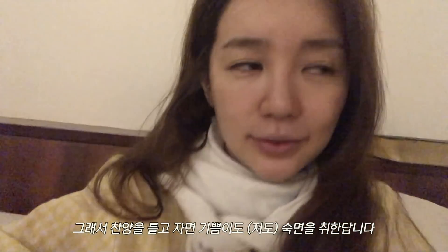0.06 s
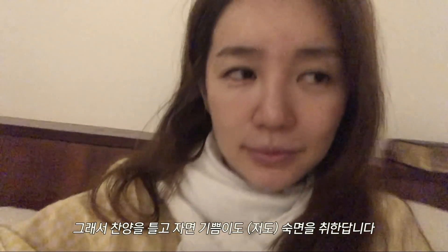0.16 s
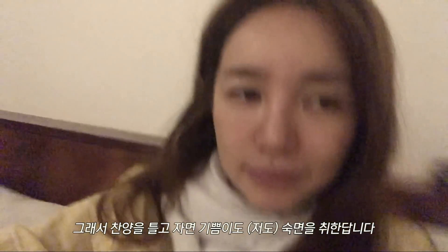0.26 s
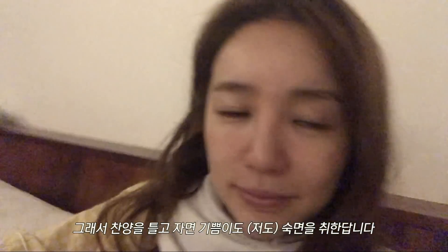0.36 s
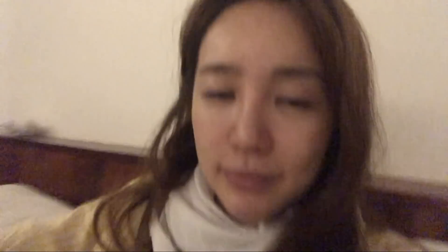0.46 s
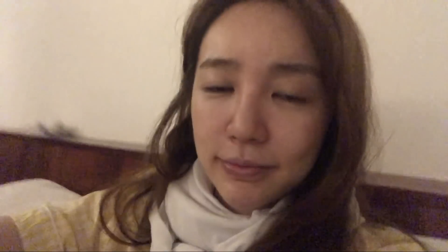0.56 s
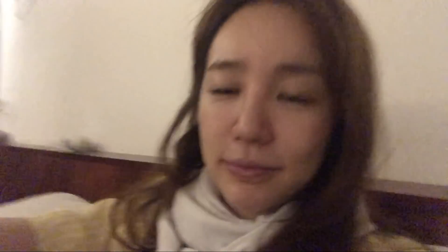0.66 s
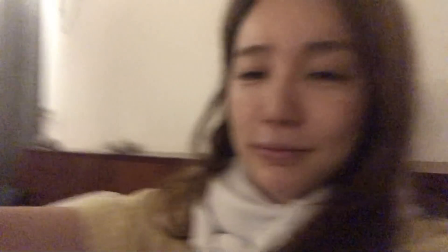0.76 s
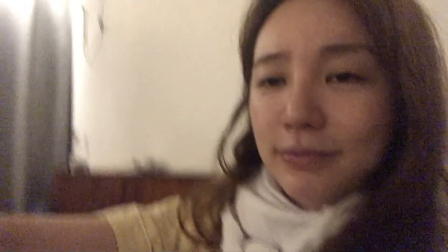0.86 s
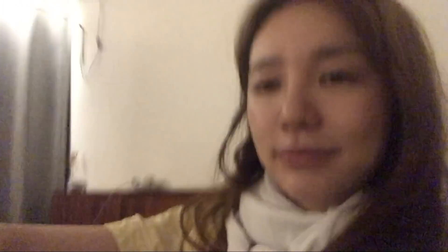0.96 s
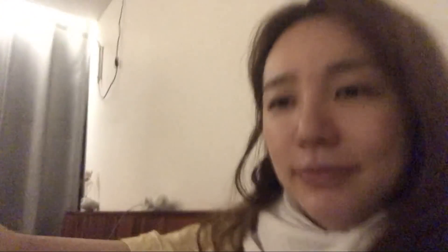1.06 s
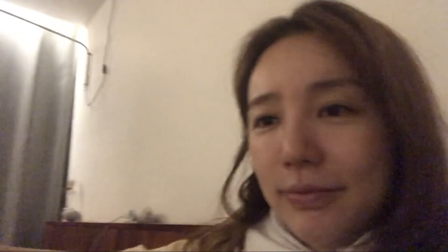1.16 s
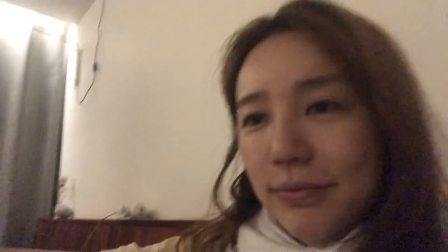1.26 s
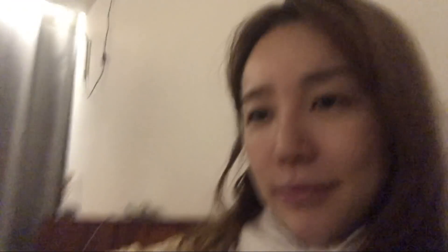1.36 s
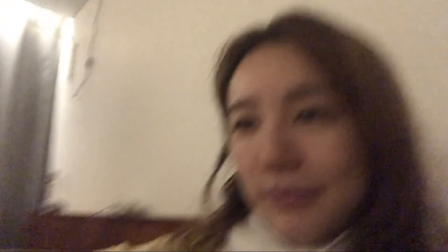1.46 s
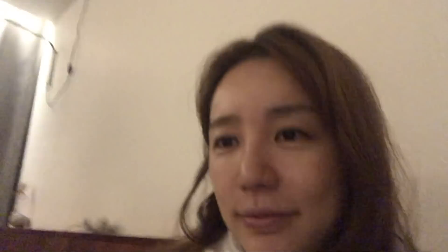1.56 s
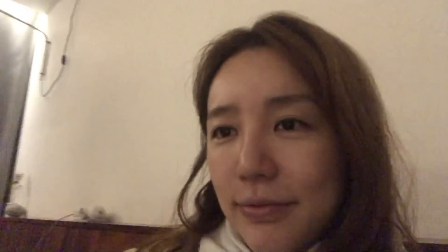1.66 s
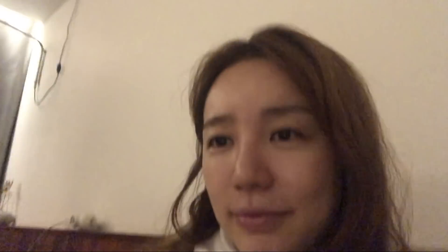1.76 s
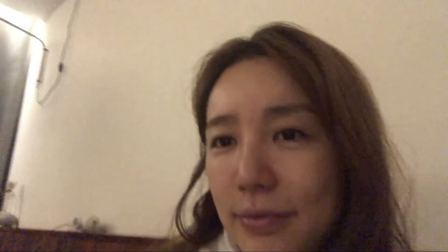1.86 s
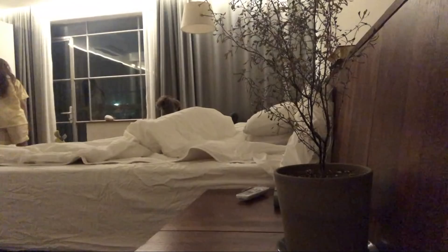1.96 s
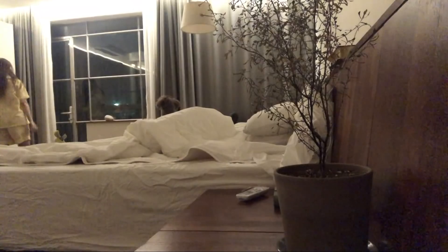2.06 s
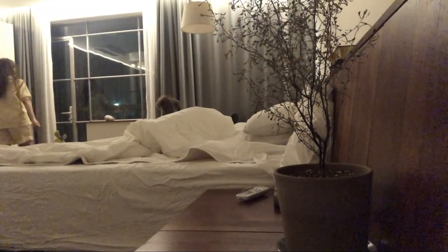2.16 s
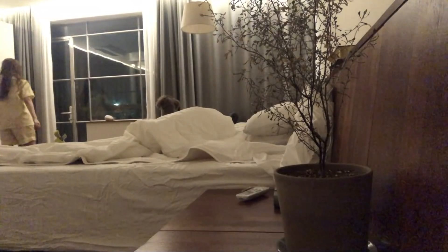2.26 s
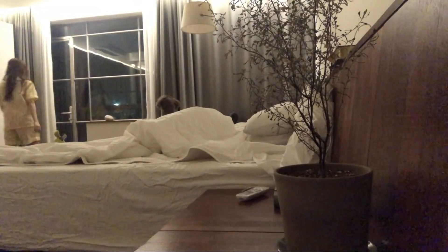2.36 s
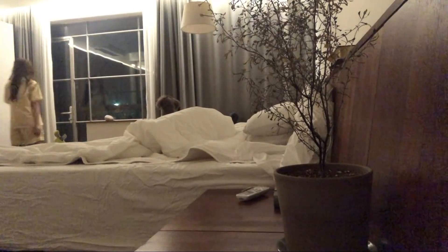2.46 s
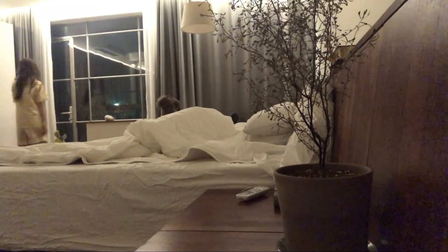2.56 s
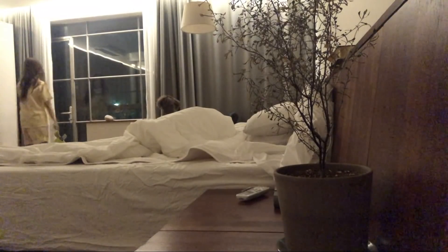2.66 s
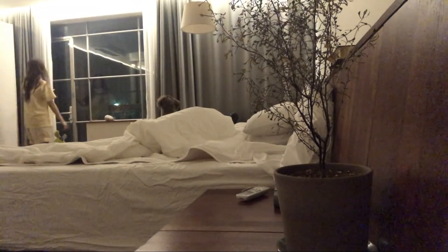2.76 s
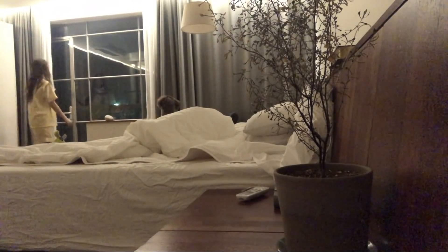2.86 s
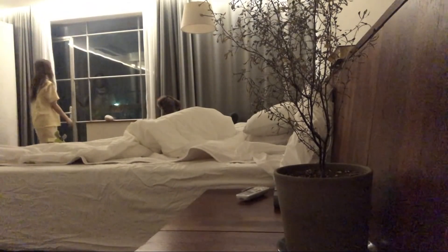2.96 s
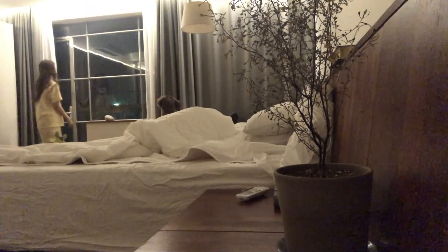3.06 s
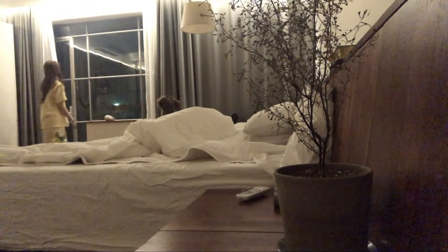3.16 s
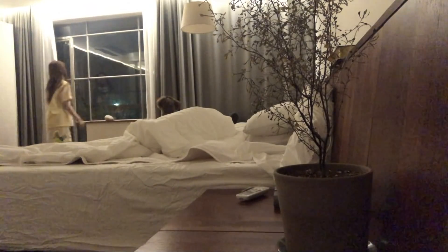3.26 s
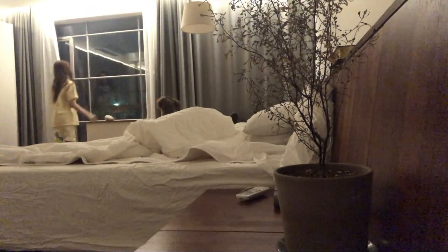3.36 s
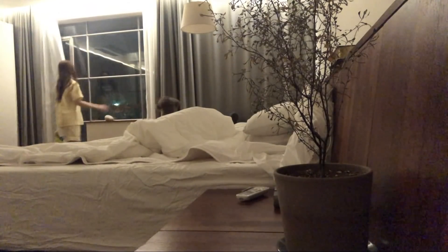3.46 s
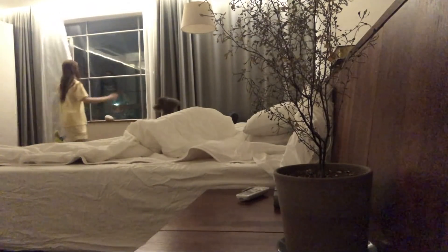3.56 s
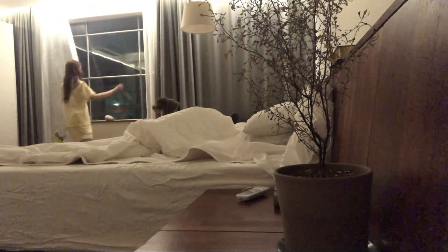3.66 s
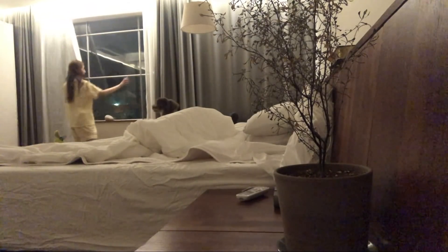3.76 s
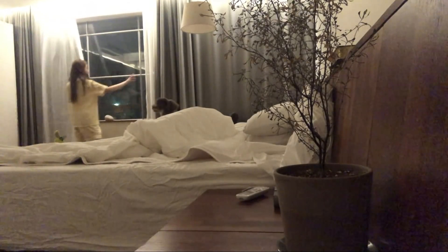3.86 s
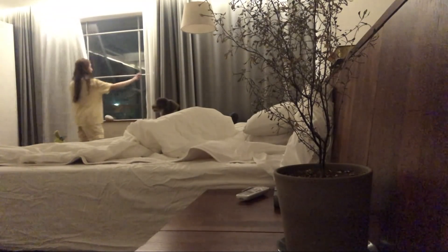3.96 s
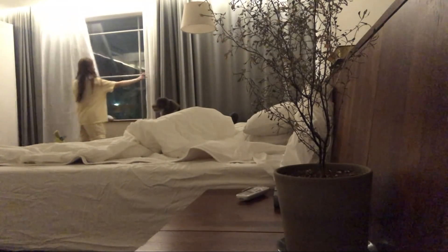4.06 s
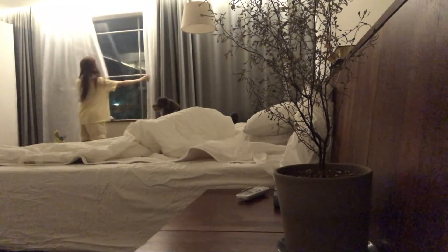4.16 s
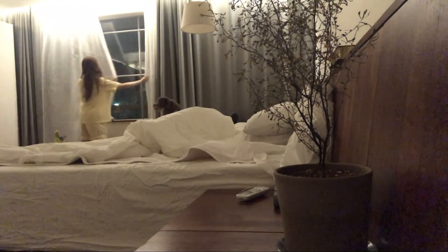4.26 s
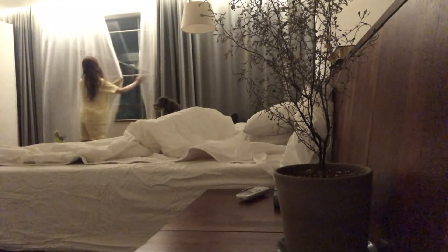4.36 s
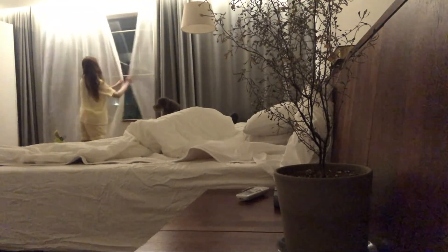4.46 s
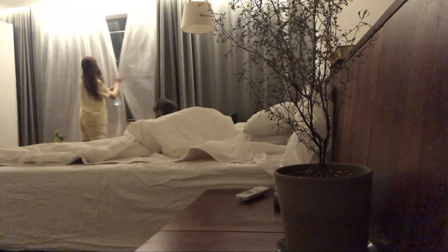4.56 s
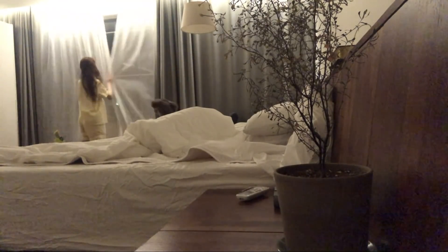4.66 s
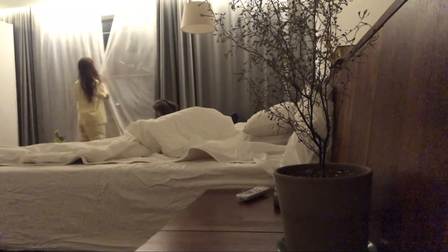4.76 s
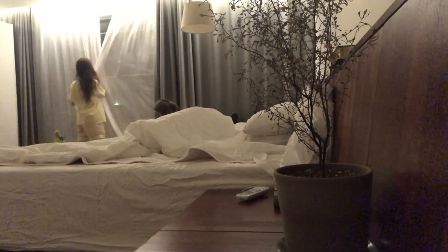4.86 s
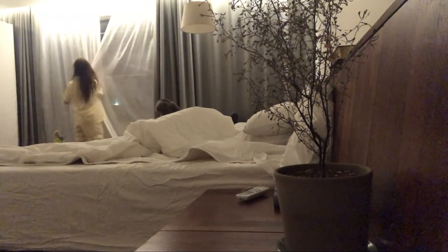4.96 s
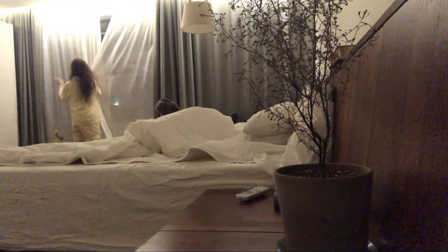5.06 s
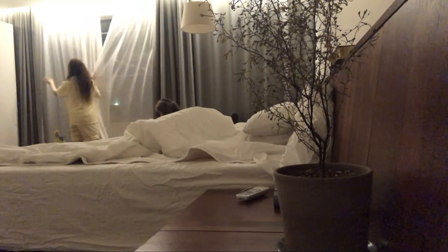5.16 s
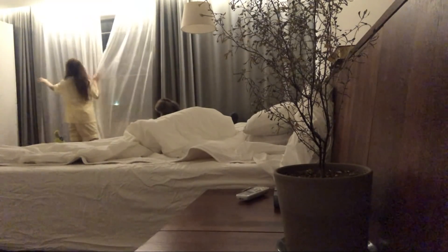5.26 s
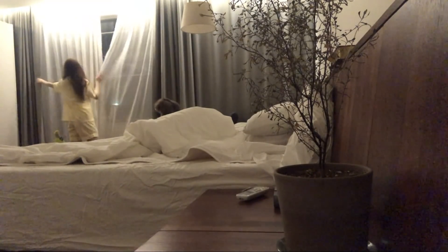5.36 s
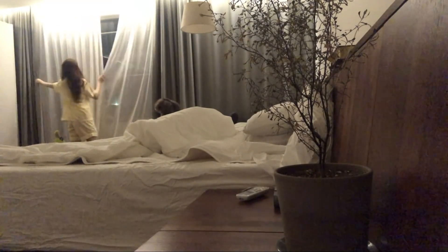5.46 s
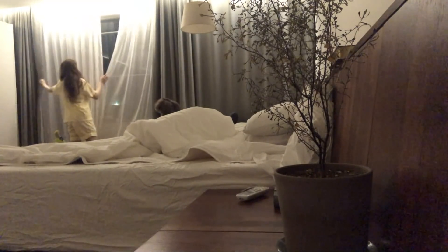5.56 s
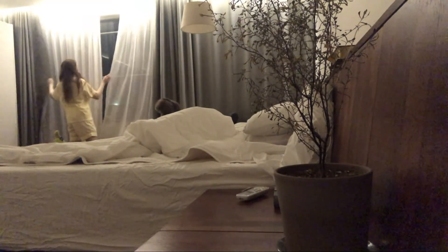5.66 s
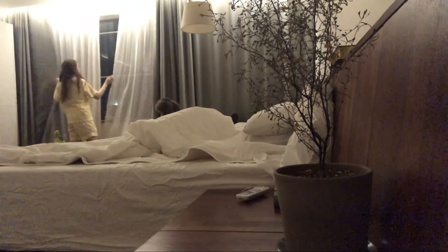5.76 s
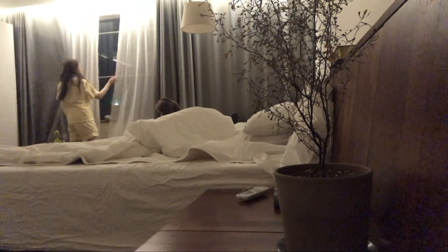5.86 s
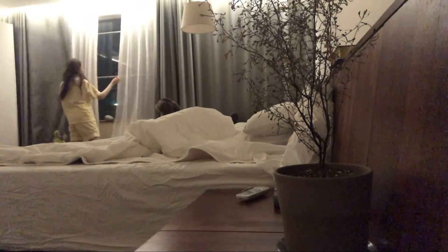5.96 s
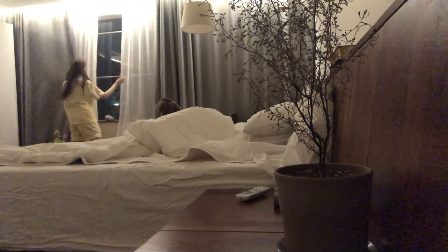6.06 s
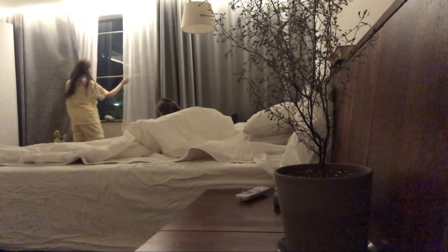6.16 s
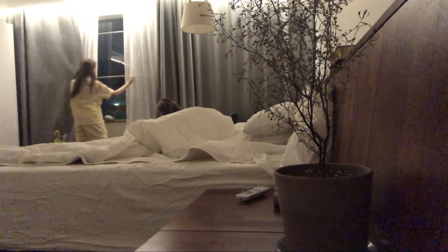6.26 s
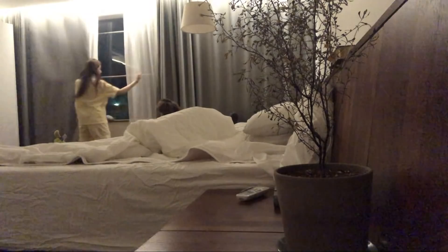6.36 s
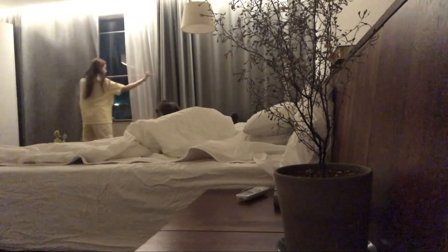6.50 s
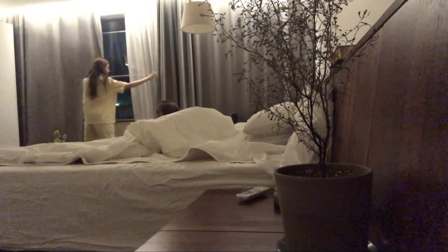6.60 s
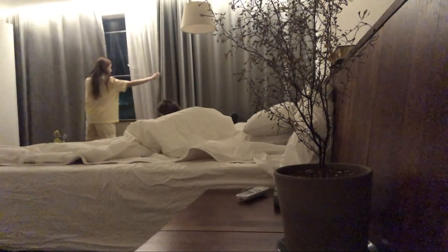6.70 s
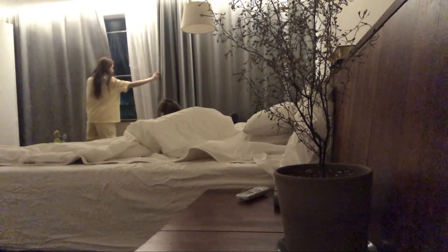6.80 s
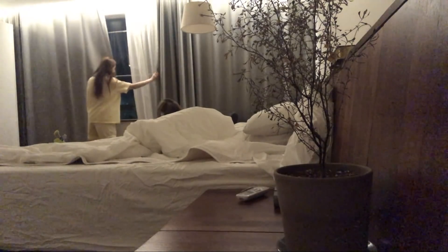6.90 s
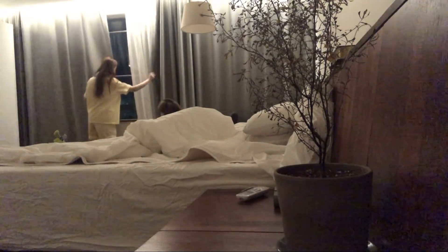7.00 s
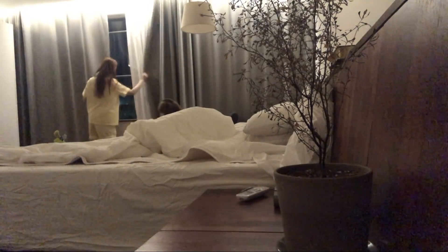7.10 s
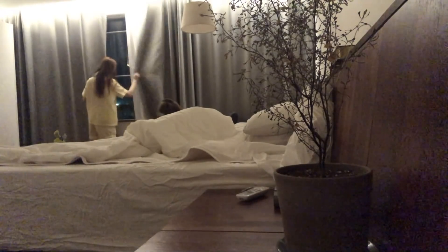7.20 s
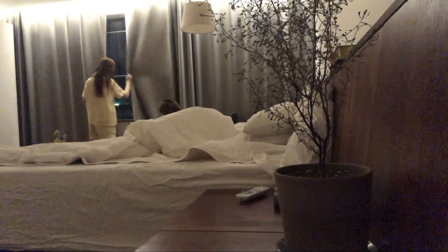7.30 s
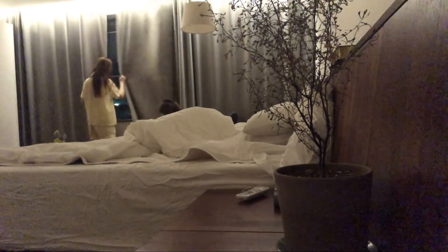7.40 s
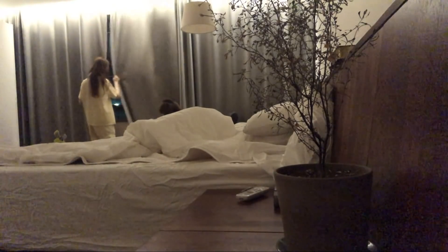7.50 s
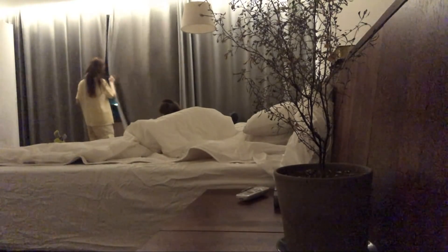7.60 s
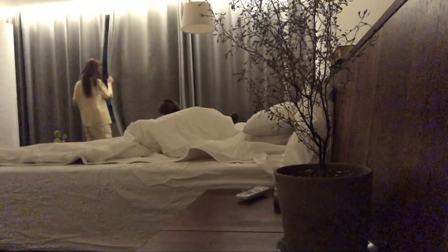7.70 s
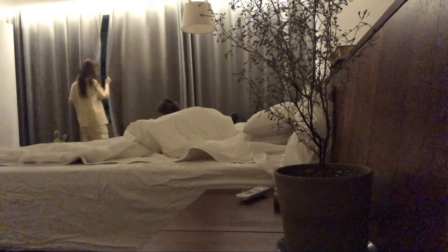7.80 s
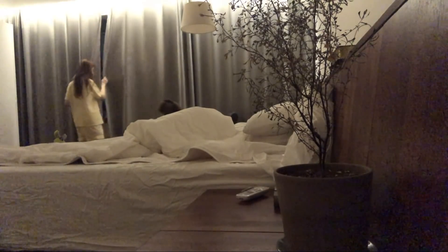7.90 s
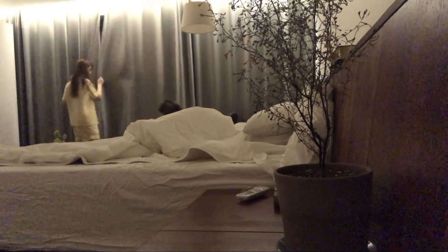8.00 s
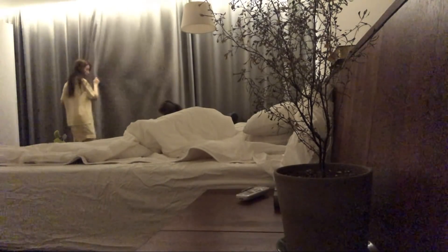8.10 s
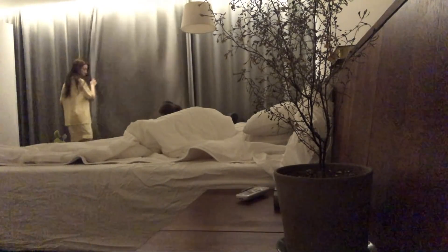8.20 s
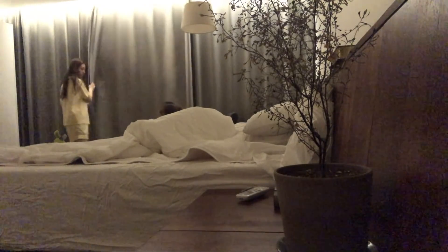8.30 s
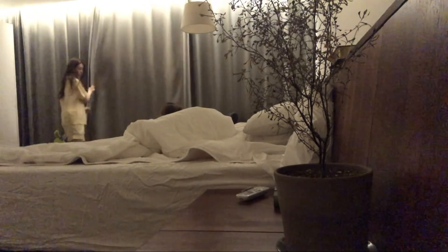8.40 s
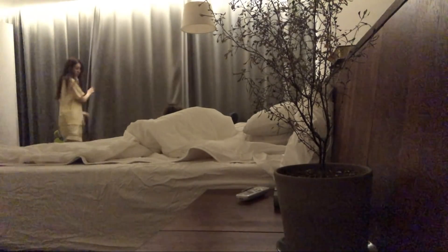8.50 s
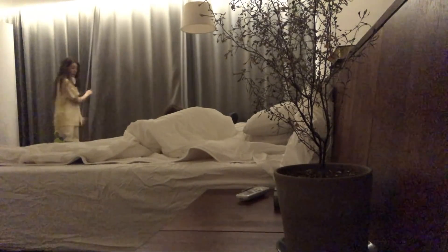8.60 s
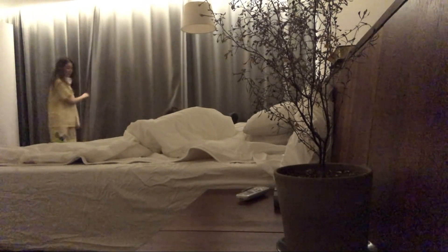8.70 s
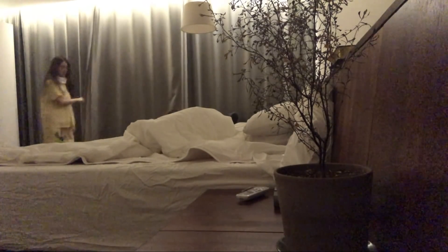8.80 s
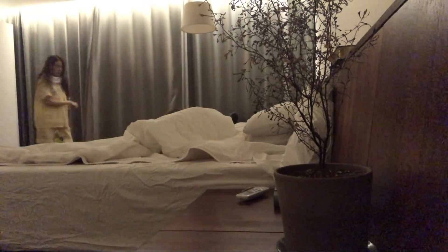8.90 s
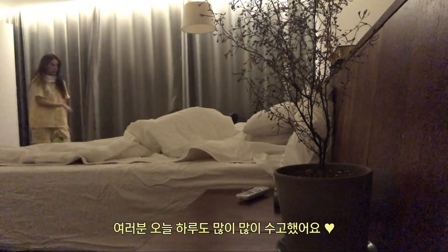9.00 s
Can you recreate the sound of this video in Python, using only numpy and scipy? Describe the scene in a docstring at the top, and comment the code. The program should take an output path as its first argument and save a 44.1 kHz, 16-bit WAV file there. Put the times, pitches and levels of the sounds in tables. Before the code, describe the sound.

After hollow bumps and bedding rustle, four curtain pulls rasp and rattle across a ceiling rail, with cloth swishes and soft barefoot thumps.

```python
"""Two sheer curtains, then two heavy drapes, are drawn shut in a quiet bedroom: random micro-slips of the
gliders scrape and ring the rail, bursts clack, stick-slip tones squeal, low modes rumble in the ceiling box.
The cloth swishes as filtered grains. First, someone shifts on a bed with a camera in hand: sheets rustle,
springs sing as decaying sines, the case answers knocks and rubs with a hollow resonance.
Footsteps, wooden creaks and a wavering deep hum come and go over still room air."""
import sys
import numpy as np
from scipy import signal
from scipy.fft import rfft, irfft, next_fast_len
from scipy.io import wavfile
from scipy.ndimage import uniform_filter1d

SR = 44100
rng = np.random.default_rng(int(sys.argv[2]) if len(sys.argv) > 2 else 0)


def master_out(mix):
    """Clip the mix to full scale and print it as 16-bit PCM to the path in sys.argv[1]."""
    frames = np.transpose(np.atleast_2d(mix))
    ceiling = np.clip(frames, -1, 1)
    pcm = np.round(ceiling * 32767).astype(np.int16)
    wavfile.write(sys.argv[1], SR, pcm)


N = 398840
BEDROOM_T60_S = 0.3


def from_db(db):
    """Decibels to amplitude gain."""
    return 10 ** (np.asarray(db) / 20)


def rms_one(x):
    """Scale to unit power."""
    return x / np.sqrt(np.mean(x ** 2) + 1e-20)


def together(*gains):
    """Joint gain of unrelated forces: powers add."""
    return np.sqrt(sum(gain ** 2 for gain in gains))


def noise():
    """White noise."""
    return rng.standard_normal(N)


def drift(knots_per_s):
    """Slow random curve with unit power: linear between random knots."""
    knots = rng.standard_normal(20000)
    position = np.arange(N) / SR * knots_per_s
    return rms_one(np.interp(position, np.arange(len(knots)), knots))


def grains(per_s, spread_db):
    """Tiny random contacts of uneven size and either sign, unit power."""
    sizes = from_db(spread_db * np.minimum(rng.exponential(1, N), 4))
    signed = sizes * rng.choice([-1, 1], N)
    return rms_one(signed * (rng.random(N) < per_s / SR))


def clicks(rows):
    """One impulse per row of (t/s, level/dB)."""
    out = np.zeros(N)
    for start_s, db in rows:
        out[max(0, round(start_s * SR))] += from_db(db)
    return out


RISE_CURVE = 0.46   # exponent of the rise over time


def envelopes(rows, follows=1, curve=RISE_CURVE):
    """Rise, hold, decay from rows (t, rise, hold, t60, level..): one gain per level; follows = dB per dB of speed."""
    t, power = np.arange(0, N + 32, 32) / SR, 0
    for start_s, rise_s, hold_s, t60_s, *levels_db in rows:
        rise = np.clip((t - start_s) / rise_s, 0, 1) ** curve
        coasting_s = np.maximum(t - start_s - rise_s - hold_s, 0)
        speed = rise * from_db(-60 * coasting_s / t60_s)
        power = power + np.outer(from_db(levels_db), speed ** follows) ** 2
    return [np.interp(np.arange(N) / SR, t, gain) for gain in np.sqrt(power)]


def in_time(rows):
    """Each column of a curve, interpolated at every sample."""
    knots_s, *columns = np.transpose(rows)
    return [np.interp(np.arange(N) / SR, knots_s, column) for column in columns]


def during(rows):
    """1 while a curve lasts, with soft edges."""
    t = np.arange(N) / SR
    return uniform_filter1d(1. * ((t >= rows[0][0]) & (t <= rows[-1][0])), size=600)


def colour(x, spectrum):
    """Causal minimum-phase filter that follows a spectrum, via the folded cepstrum."""
    size = next_fast_len(len(x) + 8192, real=True)
    size += size % 2
    hz, db = np.transpose(spectrum)
    log_hz = np.log(np.fft.rfftfreq(size, 1 / SR) + 1)
    log_gain = np.log(from_db(np.interp(log_hz, np.log(hz), db)))
    cepstrum = irfft(log_gain)[:size // 2]
    cepstrum[1:] *= 2
    return irfft(rfft(x, size) * np.exp(rfft(cepstrum, size)))[:len(x)]


def resonance(x, hz, width_hz):
    """Two-pole resonance with about unit peak gain."""
    r = np.exp(-np.pi * width_hz / SR)
    zeros = np.array([1, 0, -1]) * (1 - r * r) / 2
    poles = [1, -2 * r * np.cos(2 * np.pi * hz / SR), r * r]
    return signal.lfilter(zeros, poles, x + 1e-18)   # offset avoids denormals


def body(x, modes):
    """Parallel resonances with alternating signs."""
    return sum((-1) ** k * from_db(db) * resonance(x, hz, width_hz)
               for k, (hz, width_hz, db) in enumerate(modes))


def split(x, hz):
    """Crossover: parts below and above hz."""
    filters = [signal.butter(2, hz, kind, fs=SR, output="sos") for kind in ("low", "high")]
    return [signal.sosfilt(np.vstack([f, f]), x + 1e-18) for f in filters]


def bedroom(x, wet_db):
    """Direct sound plus a short diffuse tail of decaying noise."""
    t = np.arange(SR // 2) / SR
    tail = rng.standard_normal(len(t)) * from_db(-60 * t / BEDROOM_T60_S) * (t > .002)
    return x + from_db(wet_db) * signal.fftconvolve(x, tail / np.linalg.norm(tail))[:N]


# still room spectrum: f/Hz, relative level/dB per Hz
AIR = [(18, -27), (30, -8), (66, 2), (140, -12.5), (202, -2), (505, -13), (591, -13.5), (1910, -24.5),
       (7260, -25.5), (8280, -32.5), (15500, -31)]


def room_air():
    """Steady coloured noise of the still room."""
    return from_db(-66) * rms_one(colour(noise(), AIR))


# sheets and sleeves shifting close by: t/s, rise/s, hold/s, t60/s, level/dB
RUSTLES = [(-.02, .015, .2, 1.54, -54.5), (.4, 0.043, 0.42, 1, -63), (.92, 0.034, 0.045, 0.1, -58.5),
           (1.05, 0.038, 0.025, 0.12, -60), (2.06, 0.021, .01, .25, -62.5), (2.3, 0.033, .02, 0.35, -79)]
# sheet spectrum: f/Hz, relative level/dB per Hz
SHEETS = [(710, -5), (1200, -22), (1600, -4), (1740, -4), (2440, -7), (3220, 1), (4710, -1.5), (14000, -10)]
# grip on the camera: t/s, rise/s, hold/s, t60/s, sleeve level/dB, dull handling level/dB, fibre level/dB
GRIP = [(-.02, .015, 1.974, .6, -68.5, -66.5, -81)]


def sheets():
    """Cloth friction as grains, flapping as dull noise."""
    sleeve, *_ = envelopes(GRIP)
    rustle = together(envelopes(RUSTLES)[0], sleeve)
    friction = rms_one(colour(grains(per_s=13000, spread_db=4.5), SHEETS))
    flapping = rms_one(colour(noise(), FOLDS))
    return rustle * (from_db(-2.0) * friction + from_db(1.5) * flapping)


# bed springs: t/s, f/Hz, level/dB, t60/s
SPRINGS = [(0.0, 3374, -53.5, 1.1), (0.17, 3106, -51.5, 1), (0.14, 2400, -63, 2.1),
           (0.34, 1992, -58.5, 0.7), (0.22, 3343, -59.5, 2.6)]


def springs():
    """Bed springs sing faintly: decaying sines."""
    t = np.arange(N) / SR
    out = np.zeros(N)
    for start_s, hz, db, t60_s in SPRINGS:
        decay = from_db(db - 60 * np.abs(t - start_s) / t60_s)
        out += (t > start_s) * decay * np.sin(2 * np.pi * hz * t)
    return out


# hand bumping the camera: t/s, deep thud level/dB, dull knock level/dB
THUD_HITS = [(.145, -50, -63), (.28, -67, -54), (.565, -64, -57), (0.803, -50, -49), (1.02, -49, -64),
             (1.225, -64, -68), (1.74, -61, -76), (2.075, -77, -57.5)]
# shape of every bump: rise/s, hold/s, t60/s
THUD_SHAPE = (.008, 0.015, 0.28)
# thud spectrum: f/Hz, relative level/dB per Hz
THUDS = [(25, -20), (50, 4), (100, 3), (200, -2), (400, -5.5), (800, -48.5)]


def camera_thuds():
    """Hand bumps and fidgeting grip: low noise in a deep and a dull band."""
    _, handling, _ = envelopes(GRIP)
    deep_gain, dull_gain = envelopes([(start_s, *THUD_SHAPE, *levels) for start_s, *levels in THUD_HITS])
    deep, dull = split(colour(noise(), THUDS), hz=110)
    fidget = handling * from_db(1.6 * drift(14))
    deep = together(deep_gain, from_db(-2.5) * fidget) * rms_one(deep)
    return deep + from_db(2.0) * together(dull_gain, fidget) * rms_one(dull)


# fingers on the case: t/s, hollow note peak level/dB, nail tick level/dB
KNOCKS = [(0.1356, -42.5, -50), (0.4722, -43.5, -70), (0.5333, -47, -70), (0.5445, -42, -70),
          (0.5781, -35, -65), (0.7092, -43, -65), (0.7275, -39, -70), (0.783, -53, -26), (0.7885, -30, -65),
          (0.811, -16.5, -22), (0.9643, -37.5, -70), (1.057, -34, -30), (1.065, -35, -70),
          (1.376, -38.5, -65), (1.391, -31.5, -60), (1.543, -41, -70), (1.575, -34, -60),
          (1.8664, -46.5, -36), (1.96, -41.5, -65), (1.968, -40.5, -70)]
# nail tick spectrum: f/Hz, relative level/dB per Hz
TICK = [(300, -9), (1000, -1), (2000, -6), (3500, -12), (8000, -22.5), (16000, -27)]
# fingers sliding on the case: t/s, hold/s, level/dB
RUBS = [(0.533, .015, -47.5), (0.799, 0.076, -43), (0.959, 0.027, -49), (1.054, 0.069, -48.5),
        (1.379, 0.069, -53.5), (1.512, 0.23, -56.5)]
# case modes: f/Hz, width/Hz, gain/dB
CASE = [(543, 122, 9), (717, 256, -1)]
RUB_RISE_S, RUB_T60_S = 0.0085, 0.13


def camera_case():
    """Fingers tap and rub the case, which answers with a hollow, quickly damped note."""
    def hollow(x):
        return resonance(body(x, CASE), hz=575, width_hz=270)
    single_peak = np.abs(hollow(clicks([(0, 0.005)]))).max()
    knocks = hollow(clicks([(start_s, db) for start_s, db, _ in KNOCKS])) / single_peak
    ticks = from_db(10.5) * colour(clicks([(start_s, db) for start_s, _, db in KNOCKS]), TICK)
    slides, = envelopes([(start_s, RUB_RISE_S, hold_s, RUB_T60_S, db) for start_s, hold_s, db in RUBS])
    rub_gain = together(slides, from_db(2.0) * envelopes(GRIP)[0])
    return knocks + ticks + rub_gain * rms_one(hollow(noise()))


# deep hum: t/s, rise/s, hold/s, t60/s, level/dB
HUMS = [(-.02, .015, 1.4, 2.5, -66), (1.3, 0.65, .08, .12, -57), (2.72, .25, 0.22, .6, -57),
        (3.22, 0.031, .03, .9, -44), (3.45, .1, .95, 3.4, -56.5)]


def hum():
    """Sine around 44 Hz, wavering in pitch and level."""
    hz = 44 + 2.2 * drift(14)
    tone = np.sin(2 * np.pi * np.cumsum(hz) / SR)
    return envelopes(HUMS)[0] * from_db(1.3 * drift(8.9)) * tone


# swishes of cloth: t/s, rise/s, hold/s, t60/s, folds level/dB, fibres level/dB
SWISHES = [(0, .002, 0.0056, 0.16, -50, -48.5), (2.61, .21, .08, 0.47, -70, -56.5),
           (2.93, 0.084, .03, 0.3, -63, -53), (3.17, .06, .02, 0.25, -68, -56.5),
           (3.43, .07, .02, 0.6, -60, -51.5), (3.68, 0.078, 0.063, 0.72, -58, -46),
           (4.27, 0.11, .02, 0.86, -54.5, -51), (4.66, 0.19, 0.021, 0.5, -41, -50.5),
           (4.96, .13, .05, 0.37, -52, -86), (5.62, 0.041, 0.039, 0.32, -51, -75),
           (5.78, .06, 0.24, 0.45, -57, -53), (6.48, 0.066, .02, 1, -74, -51),
           (6.9, 0.12, .02, 1, -48.5, -69), (7.3, .11, .09, 0.32, -47.5, -48),
           (8.05, 0.29, 0.043, 0.35, -55, -61), (8.258, 0.011, 0.012, 0.17, -47.5, -40),
           (8.6, .05, .02, 0.28, -60, -62.5), (8.94, 0.039, .01, 0.53, -61, -57.5)]
# flapping folds: f/Hz, relative level/dB per Hz
FOLDS = [(300, -10), (520, 0), (800, 1.5), (1250, 2.5), (1800, -3), (2600, -4), (5000, -10), (10000, -25.5)]
# hissing fibres: f/Hz, relative level/dB per Hz
FIBRES = [(1000, -41.5), (2500, 1), (4000, 2), (7000, 6.5), (9000, 1.5), (12000, 1), (16000, -3.5)]
SWISH_CURVE = 1.2      # rise exponent: cloth swells more gently than gliders start
FOLDS_FOLLOW = 0.34    # dB per dB of glider speed


def cloth():
    """Folds flap dully as curtains travel; fibres brush over each other in fluttering swishes."""
    swish_folds, swish_fibres = envelopes(SWISHES, curve=SWISH_CURVE)
    *_, stir_folds, stir_fibres = envelopes(STIRRING)
    *_, sleeve_fibres = envelopes(GRIP)
    travel = from_db(-41.0) * envelopes(SHEER_PULLS + DRAPE_PULLS)[0] ** FOLDS_FOLLOW
    flaps = bedroom(grains(per_s=2500, spread_db=2.5), wet_db=-6)
    folds = rms_one(colour(flaps, FOLDS))
    fibres = rms_one(colour(grains(per_s=12000, spread_db=1.0), FIBRES)) * from_db(0.98 * drift(40))
    folds_gain = together(travel, swish_folds, stir_folds)
    fibres_gain = together(from_db(-9.5) * travel, swish_fibres, stir_fibres, sleeve_fibres)
    return from_db(3.5) * folds_gain * folds + from_db(4.5) * fibres_gain * fibres


# short wooden creaks: t/s, relative level/dB
CREAKS = [(0.0795, -33), (0.116, -31), (0.267, -35), (5.545, -39), (8.782, -50), (8.8195, -31),
          (8.8555, -32.5)]
# creak modes: f/Hz, width/Hz, gain/dB
CREAK = [(1800, 200, 4.5), (2270, 550, -5), (2930, 430, -4), (7500, 2500, -14.5)]


def creaks():
    """Wood gives way in single short slips: a snap and a brief rasp."""
    snaps = clicks(CREAKS)
    decay = np.exp(-1 / (0.0019 * SR))   # 1.9 ms time constant
    rasp = signal.lfilter([1], [1, -decay], snaps + 1e-18) * noise()
    return from_db(5.0) * bedroom(body(rasp + from_db(18.5) * snaps, CREAK), wet_db=-4)


# someone moving at the window: t/s, rise/s, hold/s, t60/s, low rumble, upper rumble, folds, fibres level/dB
STIRRING = [(2.55, 1.16, 1.7, 2.5, -55.5, -58.5, -64, -70), (5.45, .2, 3.16, 2.1, -48.5, -54, -58.5, -69)]
# cloth snapping taut, jolting the box: t/s, low rumble level/dB, upper rumble level/dB
JOLTS = [(3.17, -49, -55), (3.44, -48, -45), (4.72, -35, -33.5), (4.79, -42, -41), (5.59, -47, -46),
         (5.81, -39, -44), (6.23, -38, -39.5), (6.52, -38, -49), (7.53, -39, -31), (7.89, -37.5, -53),
         (8.27, -36, -38)]
# shape of every jolt: rise/s, hold/s, t60/s
JOLT_SHAPE = (.012, .025, .45)
# rumble spectrum: f/Hz, relative level/dB per Hz
RUMBLE = [(21, -58), (35, -30), (86, -30.5), (130, -5.5), (185, 6.5), (253, -2.5), (288, -3), (374, -1.5),
          (462, -9), (506, -25), (800, -31.5), (1040, -22), (1760, -120)]
# ceiling box modes: f/Hz, width/Hz, gain/dB
BOX = [(140.6, 24.6, 10.5), (186, 5, 1), (276, 12, -21), (312, 30, -8), (366.3, 19.4, 0.5)]
RUMBLE_FOLLOWS = 0.6   # dB per dB of glider speed


def rumble():
    """Pulls, jolts and stirring shake the box that carries the rail: two low modes, duller rumble above."""
    *_, pull_first, pull_second, pull_upper = envelopes(SHEER_PULLS + DRAPE_PULLS, RUMBLE_FOLLOWS)
    jolt_low, jolt_upper = envelopes([(start_s, *JOLT_SHAPE, *levels) for start_s, *levels in JOLTS])
    stir_low, stir_upper, *_ = envelopes(STIRRING)
    bumps = grains(per_s=1500, spread_db=1) * from_db(2.5 * drift(12))
    box = rms_one(colour(bumps, RUMBLE)) + from_db(-2.5) * rms_one(body(bumps, BOX))
    low, upper = split(box, hz=220)
    first, second = split(low, hz=149.5)
    shake = from_db(-2.5) * together(jolt_low, stir_low)
    low = together(pull_first, shake) * rms_one(first) + together(pull_second, shake) * rms_one(second)
    upper = together(pull_upper, jolt_upper, stir_upper) * rms_one(upper)
    return from_db(-1.0) * (low + upper)


# bare feet: t/s, peak level/dB
STEPS = [(2.58, -47.5), (2.83, -50), (3.0, -47), (3.25, -43), (3.5, -31.5), (3.545, -34.5), (3.8, -38),
         (4.12, -43), (5.2, -50), (6.69, -24), (8.8, -40)]
# floor modes: f/Hz, width/Hz, gain/dB
FLOOR = [(70.5, 25, -4), (97, 66, -6.5), (124, 10.6, 6)]


def footsteps():
    """A soft heel gives the floor one dull push."""
    def thump(x):
        return split(body(x, FLOOR), hz=218)[0]
    return thump(clicks(STEPS)) / np.abs(thump(clicks([(0, 0)]))).max()


# Pulls speed gliders up, hold, let them coast; where the load hangs decides which box mode answers.
# sheers: t/s, rise/s, hold/s, coasting t60/s, then scrape, sharp edge, box mode 1, box mode 2, upper rumble level/dB
SHEER_PULLS = [(3.555, 0.056, .02, 0.49, -40.5, -46, -50, -62, -47),
               (3.652, 0.079, 0.035, 3.2, -36.5, -41, -47.5, -62, -42.5),
               (4.125, 0.3, 0.025, 0.66, -34.5, -37, -46.5, -62, -44.5),
               (4.618, .18, .025, 0.54, -31.5, -34, -56, -37.5, -39.5)]
# drapes: same columns
DRAPE_PULLS = [(5.771, 0.067, 0.19, 2.24, -31, -28.5, -39, -41, -41),
               (6.35, 0.18, 0.13, 1.53, -29, -30, -39.5, -39, -43),
               (6.86, 0.23, 0.032, 1.5, -42.5, -45.5, -43, -41, -46),
               (7.25, 0.088, .02, .5, -37, -39, -66, -60, -52),
               (7.372, 0.058, 0.11, 1.52, -33, -38.5, -49, -36, -40),
               (8.04, 0.21, 0.048, 0.47, -35.5, -45, -59, -40.5, -47)]
# scrape under the sheers: f/Hz, relative level/dB per Hz
SHEER_SCRAPE = [(880, -45.5), (1500, -10.5), (2220, 4.5), (2860, -18), (3210, 2.5), (3510, -2), (3800, 1),
                (4100, -4), (4480, 2.5), (5610, -1.5), (7300, 0), (9230, -15.5), (14200, -36), (15500, -44)]
# scrape under the drapes: f/Hz, relative level/dB per Hz
DRAPE_SCRAPE = [(800, -40), (1500, -12.5), (1900, -3.5), (2250, 4), (2800, -5), (3300, 5.5), (4400, 2.5),
                (5100, -4), (6400, -1.5), (7800, -8.5), (9000, -15.5), (15500, -39)]
# rail modes: f/Hz, width/Hz, gain/dB
RAIL = [(1810, 50, -10), (2215, 130, 1), (3110, 50, -8), (3440, 70, -2), (3790, 80, 0), (4085, 70, 0),
        (4310, 70, 0), (4760, 60, -5), (5350, 70, -5), (5780, 90, -4), (6570, 80, -2), (7520, 100, -3)]
EDGE_FOLLOWS = 1.9   # dB per dB of glider speed


def gliders(pulls, spectrum, per_s, spread_db, ring_db, judder_db, level_db):
    """Micro-slips of many gliders hiss and ring the rail; a faster pull sharpens the edge."""
    scrape_gain, edge_gain = envelopes(pulls)[0], envelopes(pulls, EDGE_FOLLOWS)[1]
    slips = grains(per_s, spread_db) * from_db(judder_db * drift(70))
    hiss = rms_one(bedroom(colour(slips, spectrum), wet_db=-2.5))
    ring = from_db(ring_db) * rms_one(body(slips, RAIL))
    scrape, edge = split(hiss + ring, hz=5000)
    return from_db(level_db) * (scrape_gain * rms_one(scrape) + edge_gain * rms_one(edge))


def chatter(pulls, per_s, width_hz, level_db):
    """Single gliders catch and let go, each chirping briefly at one of 16 pitches."""
    catches, dealt = grains(per_s, spread_db=-1), rng.integers(0, 16, N)
    chirps = sum(resonance(catches * (dealt == k), hz, width_hz)
                 for k, hz in enumerate(np.geomspace(2500, 5400, 16)))
    return from_db(level_db) * envelopes(pulls)[0] * rms_one(chirps)


# gliders hitting each other: t/s, relative level/dB, treble gain/dB, rattle time constant/s, ring f/Hz
CLACKS = [(3.6553, -18.5, 7, 0.0045, 4500), (4.136, -16, 2.5, 0.0039, 4170),
          (4.2388, -16, -8, 0.0017, 3830), (4.402, -12, -3, 0.0039, 4200), (4.6242, -21, -6, 0.0092, 3620),
          (4.7183, -9.5, -30, 0.0059, 3260), (4.73, -23.5, 13.5, 0.0042, 3280),
          (5.506, -31, 5.5, 0.0046, 5900), (5.588, -20.5, 2.5, 0.0063, 5200),
          (5.7716, -26, -10, 0.0045, 3800), (5.8927, -18, 1.5, 0.0039, 3700), (5.944, -16, 2, 0.0025, 3600),
          (6.026, -9.5, 0.5, 0.0034, 5530), (6.035, -18, 4.5, 0.0089, 7500),
          (6.098, -15.5, -1, 0.0047, 3510), (6.2482, -12.5, -4, 0.0033, 3380),
          (6.597, -11.5, -3, 0.004, 4130), (6.7423, -12.5, -6, 0.0024, 3820),
          (7.048, -25, -8, 0.0044, 4350), (7.0768, -18.5, -8, 0.0042, 4070),
          (7.206, -21, -14, 0.0022, 4200), (7.378, -16.5, -11, 0.0092, 2210),
          (7.492, -22, -24, 0.023, 1310), (7.666, -19.5, -13, 0.012, 3560), (7.768, -33.5, -7, 0.011, 3640),
          (8.2655, -27, 2, 0.0026, 4050), (8.281, -42, 9, 0.0038, 4000), (8.4594, -34.5, -20, 0.0018, 4400)]
# clack spectrum: f/Hz, relative level/dB per Hz
CLACK = [(300, -53), (1200, -5), (2000, -2), (2800, -2), (4000, 4.5), (6500, 5), (8000, 1), (10000, -10),
         (16000, -21)]


def clacks():
    """Each collision: a noise rattle of milliseconds with its own ring, then the room's wash."""
    t = np.arange(SR // 3) / SR
    out = np.zeros(N)
    for start_s, db, treble_db, decay_s, ring_hz in CLACKS:
        rattle = np.exp(-t / decay_s)
        wash_gain = from_db(-12.5) * np.sqrt(decay_s / 0.002)   # longer rattles feed the room more
        wash = wash_gain * (1 - rattle) * from_db(-60 * t / BEDROOM_T60_S)
        burst = rng.standard_normal(len(t)) * (rattle + wash)
        low, high = split(colour(burst, CLACK), hz=5550)
        ring = from_db(12.0) * resonance(burst, ring_hz, 180)
        at = round(start_s * SR)
        out[at:at + len(t)] += from_db(db - 7) * (low + from_db(treble_db) * high + ring)
    return out


def sticking(hz, width_hz, steady):
    """Stick-slip tone on a gliding pitch: a steady share plus a hoarse band around it."""
    hoarse = drift(2 * width_hz) + 1j * drift(2 * width_hz)
    waver = steady + (1 - steady) * hoarse
    return np.real(waver * np.exp(2j * np.pi * np.cumsum(hz) / SR))


# dry gliders under the heavy drape: t/s, hold/s, f/Hz, sag/(Hz/s), level/dB
SQUEALS = [(5.723, 0.018, 3710, 300, -49), (5.77, .01, 4188, 9000, -34), (5.785, 0.037, 3640, 300, -26.5),
           (5.885, 0.029, 3800, 603, -31), (5.985, 0.166, 3630, 357, -27), (6.205, 0.038, 3560, 300, -35.5),
           (6.384, 0.12, 3570, 343, -26.5), (6.554, .13, 3510, 2107, -34.5)]
SQUEAL_RISE_S, SQUEAL_T60_S = 0.0175, 0.33


def squeals():
    """Hoarse chorus of loaded gliders; each squeal starts on its own pitch and sags."""
    t, hz = np.arange(N) / SR, np.zeros(N)
    for start_s, hold_s, pitch_hz, sag_hz_per_s, _ in SQUEALS:
        sagging_s = np.minimum(t - start_s, hold_s + SQUEAL_RISE_S)
        hz = np.where(t >= start_s, pitch_hz - sag_hz_per_s * sagging_s, hz)
    gain, = envelopes([(start_s, SQUEAL_RISE_S, hold_s, SQUEAL_T60_S, db)
                       for start_s, hold_s, _, _, db in SQUEALS])
    main = from_db(-4.0) * sticking(hz, width_hz=165, steady=0)
    upper = from_db(-10.0) * sticking(1.2 * hz, width_hz=440, steady=0)
    return gain * (main + upper) * from_db(1.1 * drift(110))


# glider creeping to rest: t/s, f/Hz, relative level/dB
SQUEAK = [(7.8, 2830, -71), (7.835, 2650, -55), (7.9, 2560, -50), (7.955, 2720, -57), (8.02, 2760, -70)]


def squeaks():
    """Two gliders creep to rest: thin stick-slip tones side by side."""
    hz, db = in_time(SQUEAK)
    lower = from_db(6.0) * sticking(hz, width_hz=25, steady=0.73)
    upper = sticking(1.125 * hz, width_hz=72, steady=0.68)
    return during(SQUEAK) * from_db(db) * (lower + upper)


def scene():
    """Bed and camera first, then sheers and drapes, over the still room."""
    handling = sheets() + springs() + camera_thuds() + camera_case()
    sheers = gliders(SHEER_PULLS, SHEER_SCRAPE, per_s=4400, spread_db=1.5,
                     ring_db=-8.5, judder_db=3.5, level_db=-1.0)
    sheers += chatter(SHEER_PULLS, per_s=400, width_hz=62, level_db=-7.0)
    drapes = gliders(DRAPE_PULLS, DRAPE_SCRAPE, per_s=4000, spread_db=3.5,
                     ring_db=-15, judder_db=2.5, level_db=-6.5)
    drapes += chatter(DRAPE_PULLS, per_s=380, width_hz=69, level_db=-11.5)
    curtains = sheers + drapes + clacks() + squeals() + squeaks() + rumble() + cloth()
    return (room_air() + handling + hum() + creaks() + footsteps() + curtains)[None]


def record(dry):
    """The small microphone loses the deepest bass; the top is cut steeply."""
    bass_cut = signal.butter(4, 34, "high", fs=SR, output="sos")
    top_cut = signal.ellip(12, .1, 70, 15850, fs=SR, output="sos")
    return signal.sosfilt(top_cut, signal.sosfilt(bass_cut, dry))


dry = scene()
out = record(dry)
master_out(out)
```